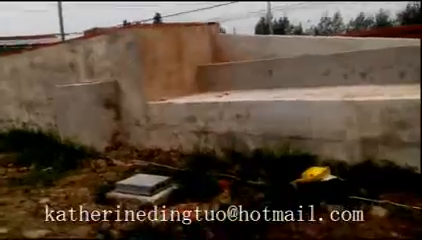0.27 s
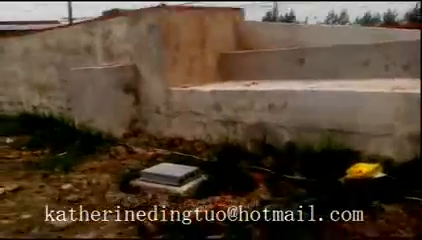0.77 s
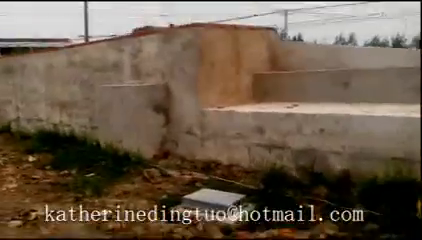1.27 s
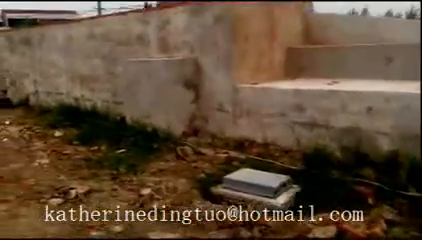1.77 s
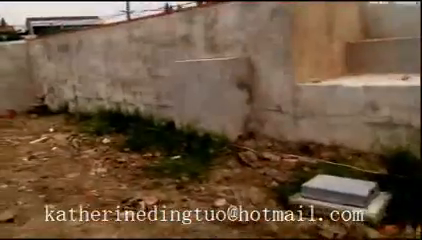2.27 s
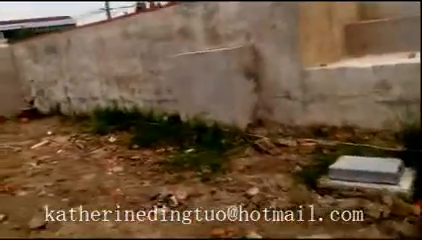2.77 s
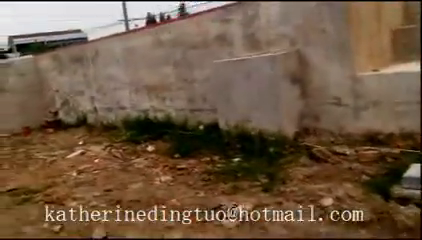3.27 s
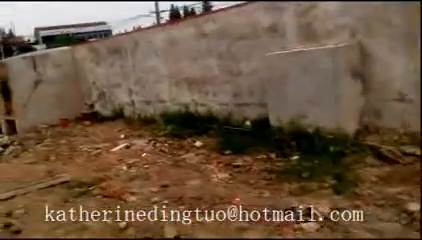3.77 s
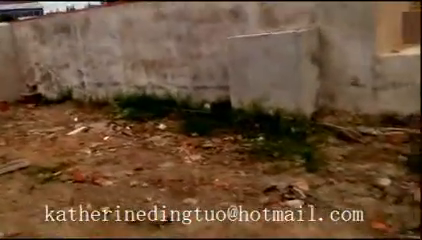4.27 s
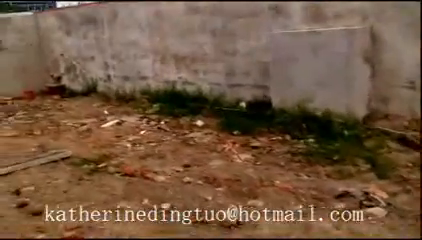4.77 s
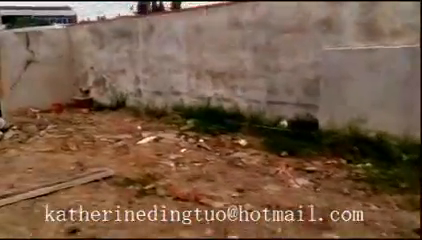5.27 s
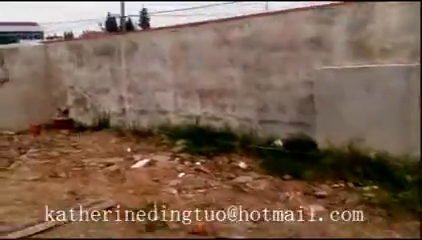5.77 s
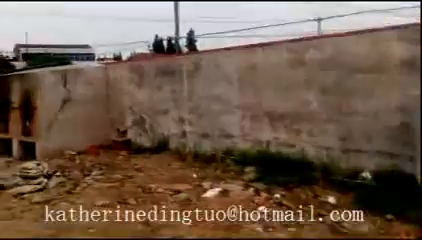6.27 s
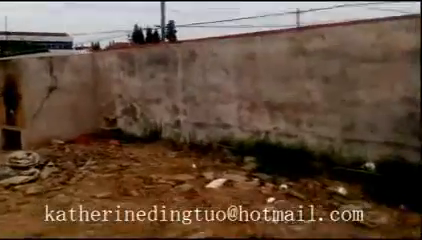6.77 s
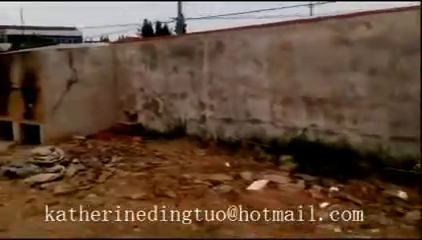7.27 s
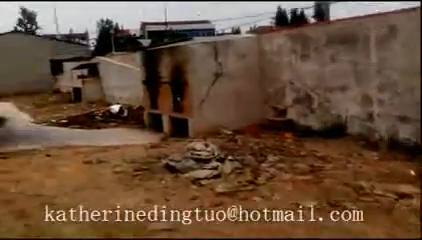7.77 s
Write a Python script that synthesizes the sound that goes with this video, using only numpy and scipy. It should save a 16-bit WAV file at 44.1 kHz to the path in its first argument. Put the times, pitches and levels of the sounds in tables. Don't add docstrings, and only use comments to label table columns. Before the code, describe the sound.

A heavy pump drones throughout, heard from a yard outside the plant and slightly to the left. Its deep hum is built on a tone near 117 Hz with buzzing harmonics that swell and fade separately, throbbing about twice a second. Over it lies a rough blower roar with low rumbling surges and wavering duct whines, loudest at first and gently sinking to the end. A long dull thud sounds at 0.1 seconds, an air blast hisses from 0.3 to 0.7, another thud lands at 0.7, and two small metal ticks follow around 0.9. From about 3 seconds one upper hum harmonic drops away, making the drone duller, while a fuller hiss blows from 3.1 to 3.4. A thinner, rising hiss comes at 6.3 to 6.7, capped by a short hard thud near 6.8. A faint tick sounds at 7.9 as the drone continues.

```python
import sys
import numpy as np
from scipy import signal
from scipy.io import wavfile
from scipy.ndimage import map_coordinates

SR = 44100
rng = np.random.default_rng(int(sys.argv[2]) if len(sys.argv) > 2 else 0)


def wrap_up_sound(samples):
    columns = np.atleast_2d(samples).T
    tamed = np.clip(columns, -1, 1)
    steps = np.round(tamed * 32767).astype(np.int16)
    wavfile.write(sys.argv[1], SR, steps)


def volts(x):
    e = np.asarray(x, float) / 20
    return 10 ** e


N = 353682

# time in seconds, level of the roar in dB.
ROAR_LEVEL = [
    (0.0, -28),
    (0.7, -29),
    (1.1, -30),
    (2.5, -31.5),
    (4.8, -32.5),
    (8.02, -34),
]


def rms_one(x):
    return x / np.sqrt(np.mean(x ** 2) + 1e-20)


def in_time(rows):
    s, *columns = np.transpose(rows)
    return [np.interp(np.arange(N) / SR, s, c) for c in columns]


def at_hz(points, hz):
    table_hz, value = np.transpose(points)
    return np.interp(np.log(hz), np.log(table_hz), value)


def drift(rate):
    r = np.exp(-80 * np.pi * rate / SR)
    sparse = rng.standard_normal(N // 40 + 2002)
    slow = signal.lfilter([1], [1, -2 * r, r * r], sparse)[2000:]
    return np.interp(np.arange(N) / 40, np.arange(len(slow)), rms_one(slow))


def swells(rows, lull_db):
    t = np.arange(N) / SR
    bells = sum(volts(db - 4.34 * ((t - s) / half_s) ** 2) for s, db, half_s in rows)
    return 20 * np.log10(volts(lull_db) + bells)


def heard(mid, side, hz):
    # frequency in Hz, likeness of the two microphones from 0 to 1.
    likeness = [(30, .88), (120, .98), (350, .94), (700, .85), (1200, .8), (1800, .66), (2400, .25),
                (4000, .22), (7000, .32), (8500, .08)]
    # frequency in Hz, left minus right level in dB.
    leaning = [(60, .8), (140, .4), (330, 1.2), (780, 1), (1500, 1.3), (3000, 3.4), (5600, 4.4),
               (10200, 4.8)]
    alike = np.clip(at_hz(likeness, hz), 0, 1)
    pair = np.sqrt(1 + alike) * mid + np.sqrt(1 - alike) * side * [[1], [-1]]
    balance_db = at_hz(leaning, hz) / 2 * np.array([[1], [-1]])
    return pair * volts(balance_db) / np.sqrt(2)


def late_right(pair, lag_s):
    at = np.arange(N) - lag_s * SR
    return np.array([pair[0], map_coordinates(pair[1], [at], order=3, mode="nearest")])


def banded_noise(colour, patchy_db):
    out, together = 0, drift(3.6)
    lowest, highest = colour[0][0], colour[-1][0]
    edges = np.geomspace(lowest, highest, round(3 * np.log2(highest / lowest)))
    white = rng.standard_normal((2, 2, N))
    for k, (low, high) in enumerate(zip(edges, edges[1:])):
        band = signal.butter(2, [low, high], "band", fs=SR, output="sos")
        mid, side = signal.sosfilt(band, white[k % 2])
        hz = np.sqrt(low * high)
        level_db = at_hz(colour, hz) + patchy_db * (.5 * together + drift(5.9))
        out = out + volts(level_db) * heard(mid, side, hz)
    return rms_one(out)


def ring(x, hz, width_hz):
    r = np.exp(-np.pi * width_hz / SR)
    gain = (1 - r * r) / 2
    return signal.lfilter([gain, 0, -gain], [1, -2 * r * np.cos(2 * np.pi * hz / SR), r * r], x)


def roar():
    # frequency in Hz, spectral density in dB per Hz.
    rumble_colour = [(21, -19.5), (32, -1.5), (45, -21.5), (70, -13), (100, -9), (150, -2.5), (220, -2.5),
                     (320, -16), (450, -14.5)]
    # frequency in Hz, spectral density in dB per Hz.
    roar_colour = [(200, -9.5), (320, 0), (520, -2.5), (800, -3.5), (1070, -2), (1500, -3), (2200, -11.5),
                   (3300, -12.5), (4500, -13.5), (6000, -17), (7300, -15.5), (8000, -20), (9000, -17),
                   (11000, -21)]
    # frequency in Hz, width in Hz, level over the roar in dB.
    ducts = [(510, 13, 4), (616, 90, 4), (720, 51, 4.5), (849, 70, 3.5), (933, 11, 2), (1015, 26, -10.5),
             (1128, 32, -9.5), (1310, 45, -0.5), (1457, 11, -3), (1582, 26, -6), (1730, 27, -1.5),
             (1904, 39, -2.5), (2066, 57, -2), (2230, 22, 4), (2526, 73, -3), (2762, 46, 0.5),
             (3035, 16, -2), (3120, 18, -3.5), (3360, 32, -6.5), (5400, 120, -10), (6290, 510, 3.5)]
    # centre in seconds, level in dB, half-length in seconds.
    surges = [(0, -31.5, 0.24), (.6, -31, 0.15), (1.12, -38, .2), (2.14, -32, 0.45), (2.72, -43.5, 0.058),
              (3.3, -33, 0.11), (4.3, -41, 0.82), (5.12, -40, 0.17), (6.0, -41.5, .15), (7.05, -35, 0.32),
              (8.0, -34, 0.25)]
    roar_db, = in_time(ROAR_LEVEL)
    under_db = -43.5 + 1.2 * (roar_db - roar_db.mean())
    rumble = volts(swells(surges, under_db) + 5.5) * banded_noise(rumble_colour, patchy_db=2.5)
    air = banded_noise(roar_colour, patchy_db=0.64)
    rings = sum(volts(db + 1.8 * drift(0.42)) * ring(air, hz, width_hz) for hz, width_hz, db in ducts)
    return rumble + volts(roar_db + 1.5) * (air + rings)


def whines():
    # frequency in Hz, width in Hz.
    tones = [(888, 15.5), (1193, 16.5), (1224, 19.5), (1665, 28.5)]
    # centre in seconds, rms level in dB, half-length in seconds.
    spells = [
        [(.02, -41, 0.56), (3.1, -36, .5), (4.804, -46, 0.11), (5.6, -45, 0.14), (6.45, -44.5, 0.21),
         (7.5, -37.5, 0.21)],
        [(1.5, -47.5, 1.3), (3.9, -52, .4), (6.2, -43, 0.28)],
        [(1.0, -46.5, .4), (3.2, -42, 0.75), (6.205, -45, 0.76), (7.9, -45, 0.18)],
        [(.5, -51, 0.26), (1.75, -41.5, .35), (3.255, -45, 0.14), (4.95, -47.5, .55)],
    ]
    out = 0
    for (hz, width_hz), rows in zip(tones, spells):
        mid, side = ring(ring(rng.standard_normal((2, N)), hz, width_hz), hz, width_hz)
        out = out + volts(swells(rows, lull_db=-52) + 1.5) * rms_one(heard(mid, side, hz))
    return out


def knocks():
    # time in seconds, peak in dB, frequency in Hz, decay by 60 dB in seconds.
    thuds = [
        (.1, -23, 225, 1.1),
        (.68, -21, 215, .9),
        (6.765, -10, 212, .3),
    ]
    # time in seconds, peak in dB.
    ticks = [
        (0.859, -24),
        (0.946, -21.5),
        (7.9072, -27),
    ]
    t, out = np.arange(N) / SR, 0
    for s, db, hz, t60 in thuds:
        age = np.maximum(t - s, 0)
        envelope = (1 - np.exp(-age / (.06 * t60))) * volts(db - 60 * age / t60)
        boom = rms_one(ring(ring(rng.standard_normal(N), hz, 90), hz, 90))
        out = out + envelope * (.25 * boom + np.sin(2 * np.pi * hz * age))
    grit = rms_one(ring(ring(rng.standard_normal(N), 5800, 5000), 5800, 5000))
    for s, db in ticks:
        out = out + (t > s) * volts(db - 2.5 - 60 * np.abs(t - s) / 0.04) * grit
    return out * volts([[.6], [-.6]])


def air_blows():
    # opening in seconds, shutting in seconds, level in dB, climb while open in dB, extra body in dB.
    blows = [
        (0.293, 0.697, -33, 3, 2.5),
        (3.076, 3.393, -33, -0.5, 4.5),
        (6.335, 6.735, -36.5, 4.5, -3),
    ]
    # frequency in Hz, spectral density in dB per Hz.
    blow_colour = [(500, 0), (1000, 11.5), (1700, 2), (2300, -6), (3200, 0.5), (4200, 1.5), (5500, -2),
                   (7400, -0.5), (8200, -16), (11000, -0.5)]
    # frequency in Hz, width in Hz, level over the jet in dB.
    nozzles = [(1190, 100, -5), (1740, 95, -2), (3130, 170, -8.5), (5210, 410, -4), (6520, 440, 1.5),
               (7180, 300, -12)]
    attack_s, release_db_per_s, body_hz = 0.035, 83.5, 1500
    t, jet, body = np.arange(N) / SR, 0, 0
    for opens, shuts, db, climb_db, body_db in blows:
        held = np.clip((t - opens) / (shuts - opens), 0, 1)
        rise = (1 - np.exp(-np.maximum(t - opens, 0) / attack_s)) ** 2
        blow = rise * volts(db + climb_db * held ** 2 - release_db_per_s * np.maximum(t - shuts, 0))
        jet = jet + blow
        body = body + blow * (volts(body_db) - 1)
    air = banded_noise(blow_colour, patchy_db=.9)
    air = air + sum(volts(db + 0.5 * drift(5.9)) * ring(air, hz, width_hz) for hz, width_hz, db in nozzles)
    low = signal.lfilter(*signal.butter(1, body_hz, fs=SR), air)
    return volts(3.5) * (jet * air + body * low)


def pump():
    # time in seconds, rms level in dB.
    pulse = [(0.0, -16.5), (0.6, -19.5), (1.5, -22), (3.5, -23.5), (4.6, -22.5), (5.4, -21), (6.3, -20),
             (7.2, -18.5), (8.02, -20)]
    # centre in seconds, rms level in dB, half-length in seconds.
    third_swells = [(0.278, -20.5, 0.31), (.89, -24, .11), (1.427, -21, 0.26), (2.61, -25.5, .13),
                    (2.896, -32, 0.24), (3.608, -21.5, .13), (3.975, -17.5, 0.12), (4.301, -21.5, 0.087),
                    (4.63, -24.5, 0.063), (4.99, -23.5, 0.12), (5.304, -26.5, 0.097), (5.676, -22, 0.072),
                    (6.03, -23, .08), (6.266, -19.5, .18), (6.69, -23, 0.2), (7.558, -30, .3)]
    # centre in seconds, rms level in dB, half-length in seconds.
    fourth_swells = [(.19, -16, 0.18), (.67, -17.5, .14), (1.15, -18, .14), (1.66, -25, 0.032),
                     (2.28, -21.5, 0.15), (2.51, -27, 0.04), (2.78, -20, 0.19), (3.51, -25, .14),
                     (3.94, -20, 0.14), (4.38, -19, .12), (4.83, -21, 0.12), (5.36, -24.5, 0.14),
                     (5.92, -29, 0.074), (6.2, -23.5, 0.24), (7.03, -28.5, 0.12), (7.6, -24.5, .33)]
    # rms level in dB, share of the roar's swing, fading in dB.
    fringe_levels = [
        (-39, -1.2, .8),
        (-41, 1, .6),
        (-45, 0, .8),
        (-47, 0, .8),
    ]
    # centre in seconds, rms level in dB, half-length in seconds.
    fringe_swells = [
        [(4.7, -44, .3), (6.5, -46, .5)],
        [(.05, -26, 0.196), (.8, -30.5, 0.14), (1.6, -47, 0.074), (2.3, -34.5, 0.27), (3.8, -45.5, .3),
         (6.2, -39.5, 0.33), (7.25, -37.5, 0.19)],
        [(1.6, -46, 0.13), (2.8, -43, 0.45), (4.0, -45, .2), (6.797, -44.5, .5)],
        [(.3, -36, .3), (2.596, -47.5, 0.4), (3.9, -36.5, 0.29), (4.803, -42, 0.27), (6.6, -37, 0.13),
         (7.998, -43.5, 0.23)],
    ]
    # order, rms level in dB, fading in dB.
    weak_orders = [(.5, -50, 1.5), (1.5, -37, 3), (2.5, -40, 3), (3.5, -37, 3), (4.5, -42, 3),
                   (5.5, -46, 3), (7, -42, 2.5)]
    lobe_hz, lull_db = 58.27, -43
    sway_rad, sway_s, sway_low_s = 0.81, 5.655, 2.405
    throb_hz, throb_top_s = 1.9, .17
    t, (open_db,), (pulse_db,) = np.arange(N) / SR, in_time(ROAR_LEVEL), in_time(pulse)
    turn = 2 * np.pi * lobe_hz * t - sway_rad * np.cos(2 * np.pi * (t - sway_low_s) / sway_s)
    throb_db = 1.5 * np.cos(2 * np.pi * throb_hz * (t - throb_top_s))
    hidden = 1 / (1 + np.exp((2.8 - t) / 0.098))
    fifth_db = -26 + throb_db + (-19.5 + 4.0 * drift(0.66)) * hidden

    orders = [(2, pulse_db + 0.13 * throb_db),
              (3, swells(third_swells, lull_db)),
              (4, swells(fourth_swells, lull_db)),
              (5, fifth_db)]
    for k, (db, share, fading_db), rows in zip((1, 6, 8, 9.05), fringe_levels, fringe_swells):
        base_db = db + share * (open_db - open_db.mean())
        orders.append((k, swells(rows, base_db) + fading_db * drift(1.5)))
    orders += [(k, db + fading_db * drift(2.25)) for k, db, fading_db in weak_orders]

    out = 0
    for k, db in orders:
        slip_rad = .8 if k in (3, 4) else .05 * k
        start = .25 * rng.uniform(0, 2 * np.pi)
        phase = k * turn + start + slip_rad * drift(.7)
        apart = 0.066 * k * drift(1.6)
        tone = np.sin(phase + apart * np.array([[1], [-1]]))
        out = out + np.sqrt(2) * volts(db + .1 * k * drift(6.2)) * tone
    return late_right(out * volts([[.4], [-.4]]), lag_s=.00028)


def scene():
    return pump() + late_right(whines() + roar() + air_blows() + knocks(), lag_s=.000415)


def top_cut(x):
    return signal.sosfilt(signal.butter(12, 10830, fs=SR, output="sos"), x)


def record(dry):
    return top_cut(dry)


dry = scene()
out = record(dry)
wrap_up_sound(out)
```